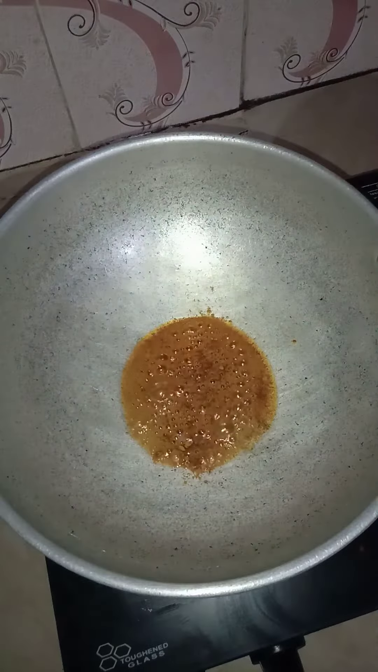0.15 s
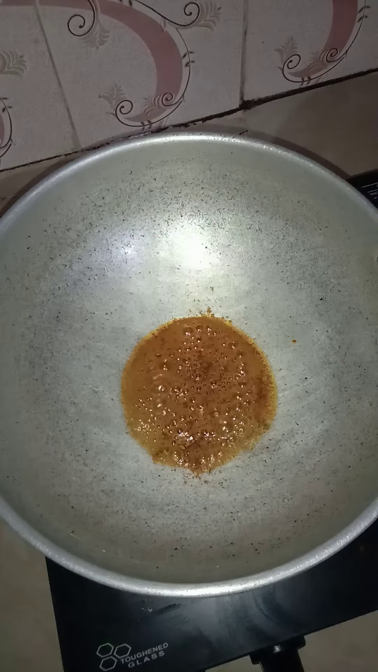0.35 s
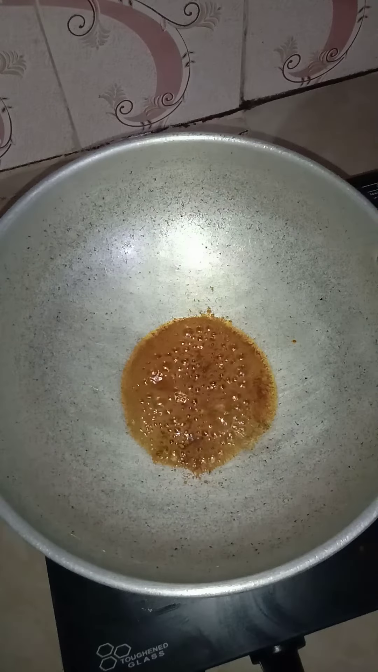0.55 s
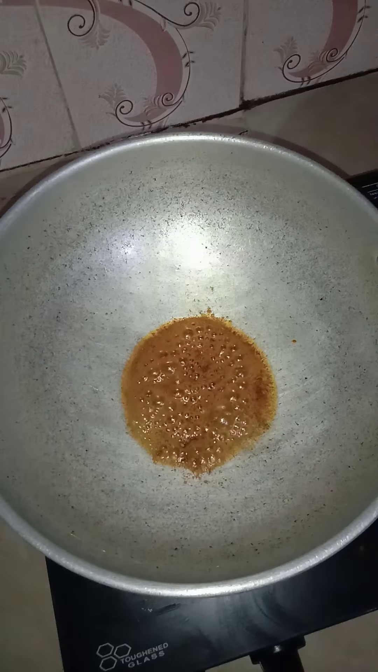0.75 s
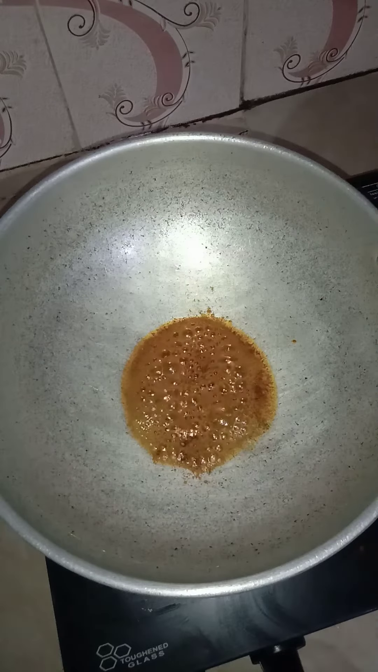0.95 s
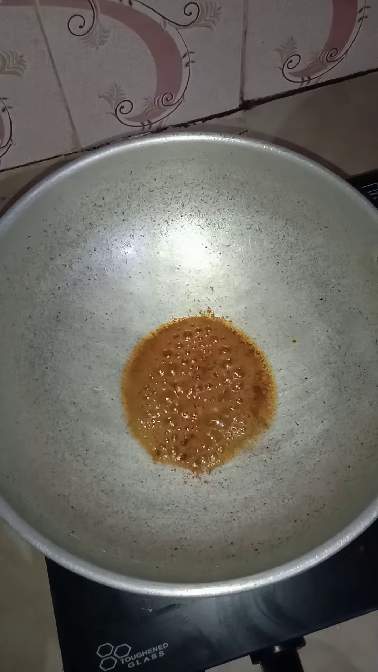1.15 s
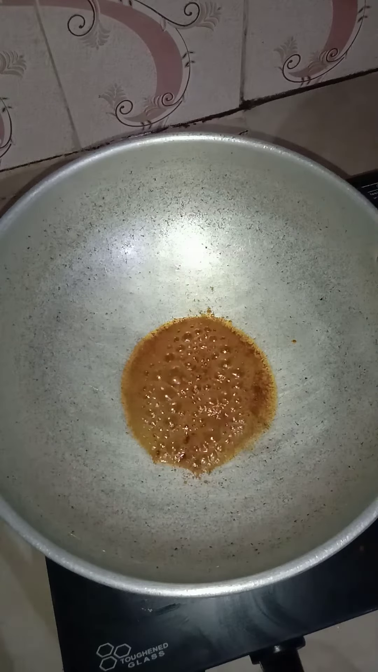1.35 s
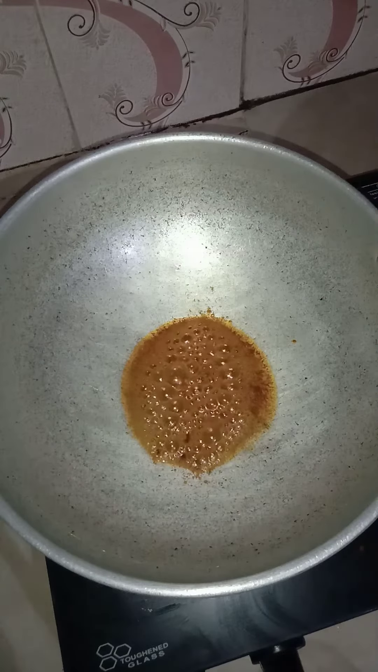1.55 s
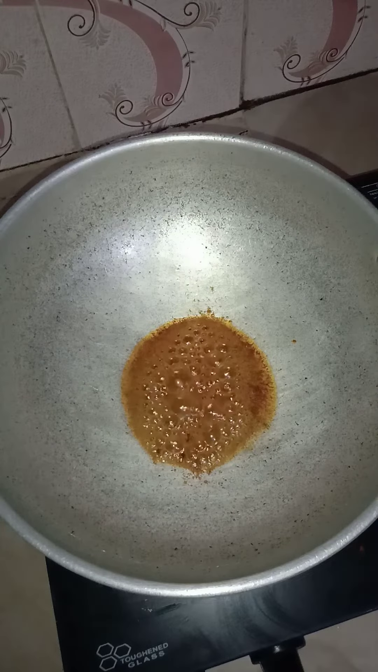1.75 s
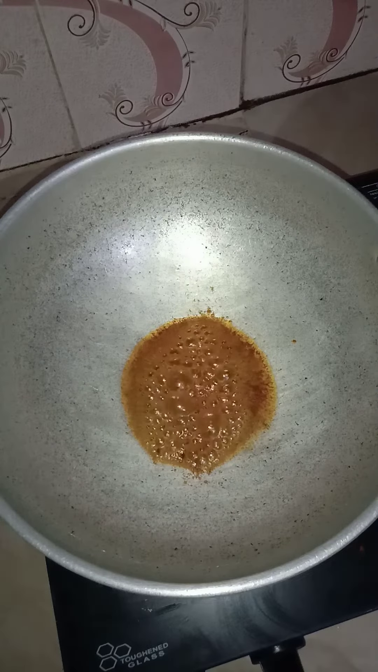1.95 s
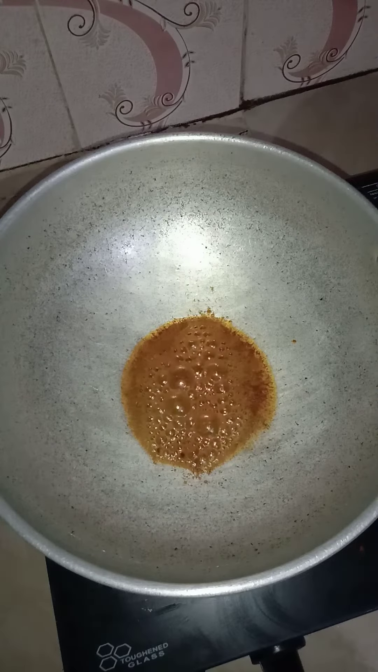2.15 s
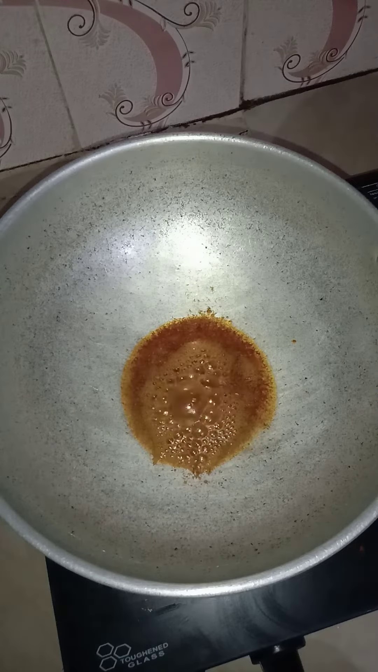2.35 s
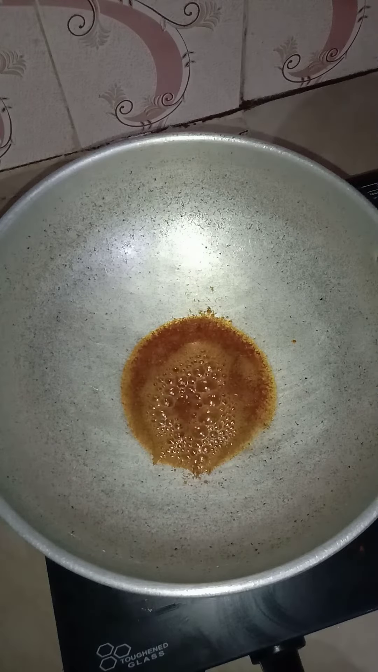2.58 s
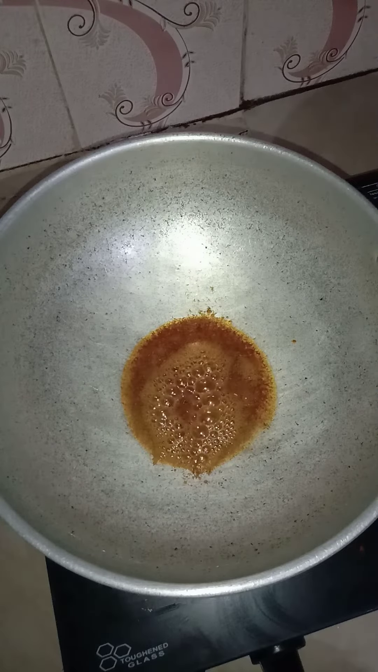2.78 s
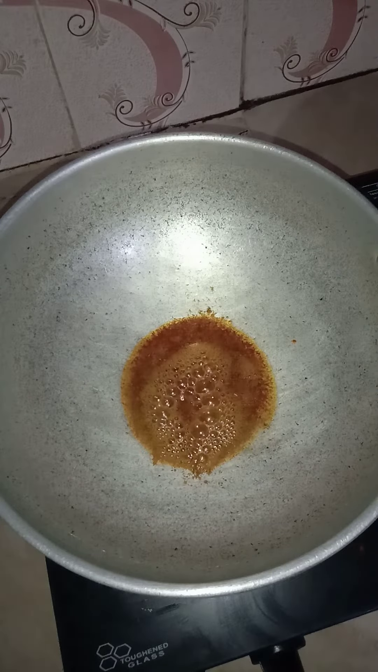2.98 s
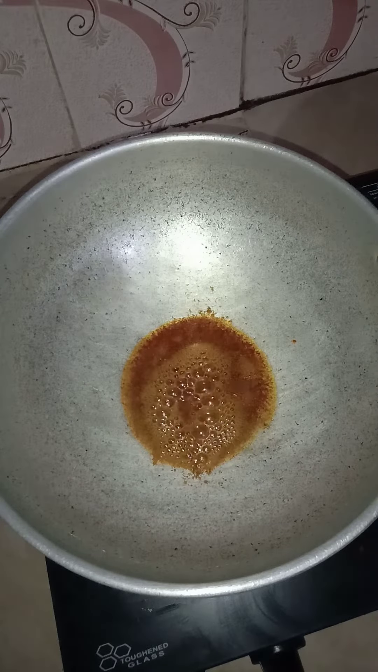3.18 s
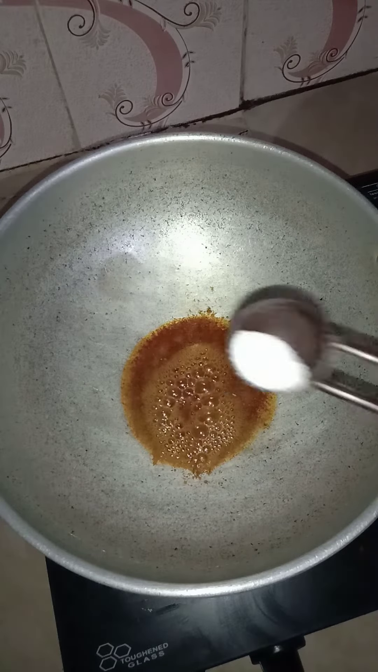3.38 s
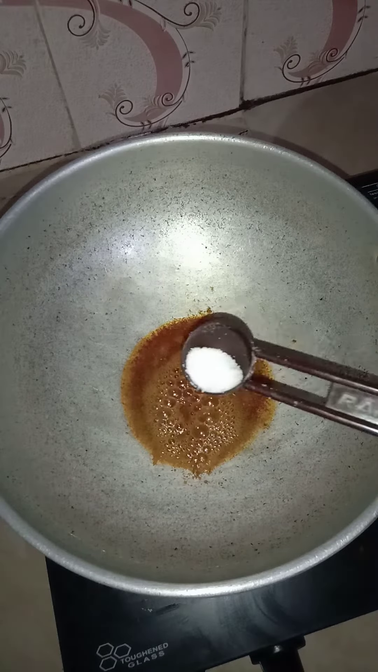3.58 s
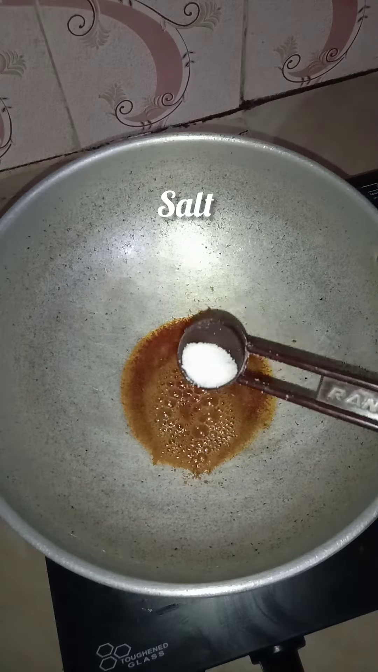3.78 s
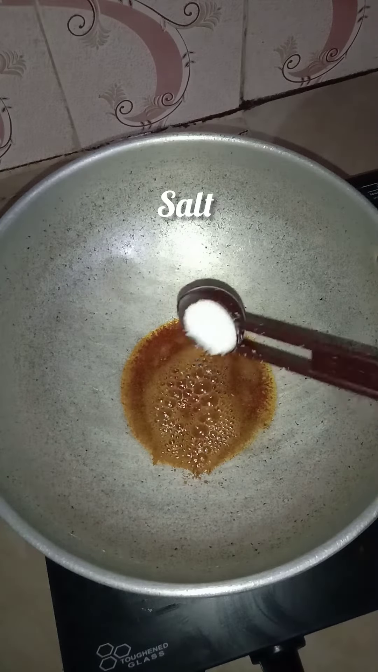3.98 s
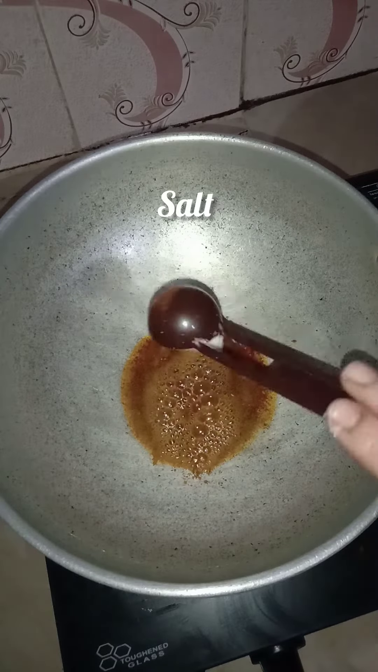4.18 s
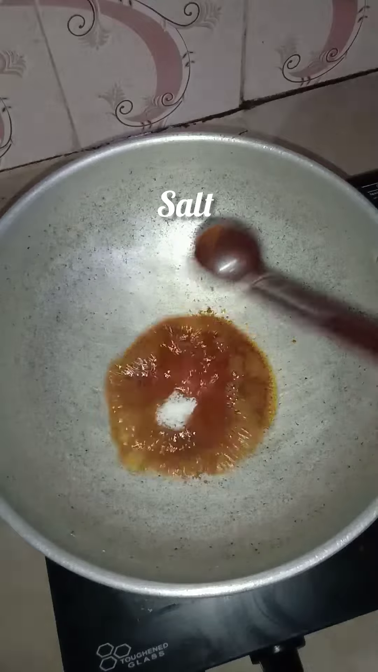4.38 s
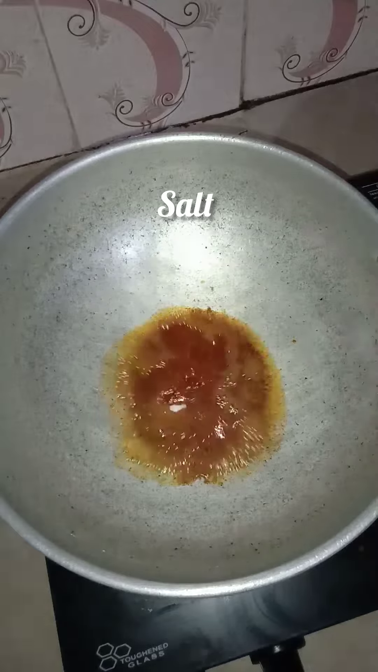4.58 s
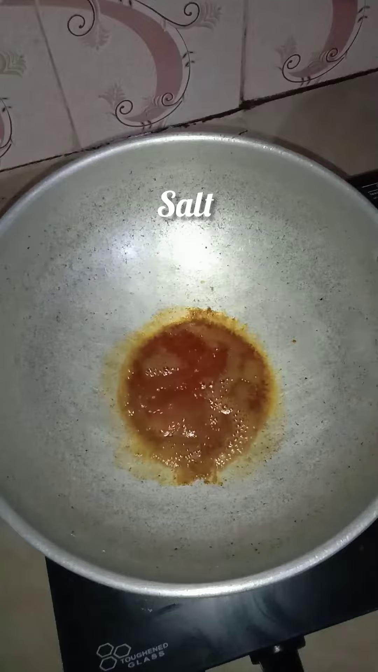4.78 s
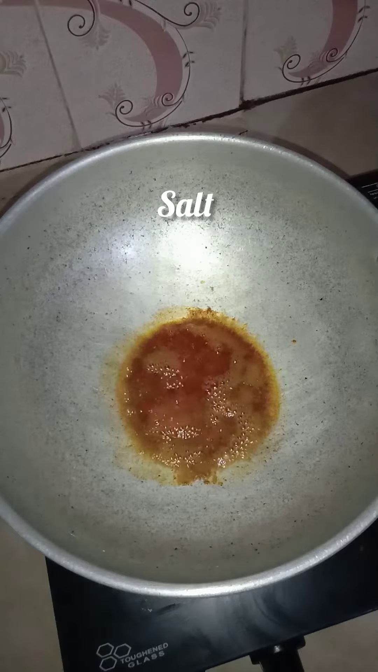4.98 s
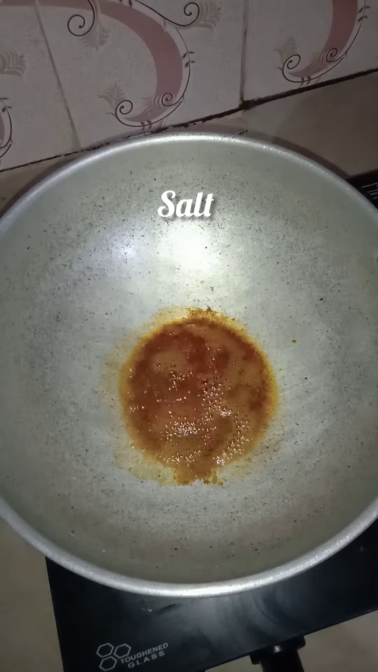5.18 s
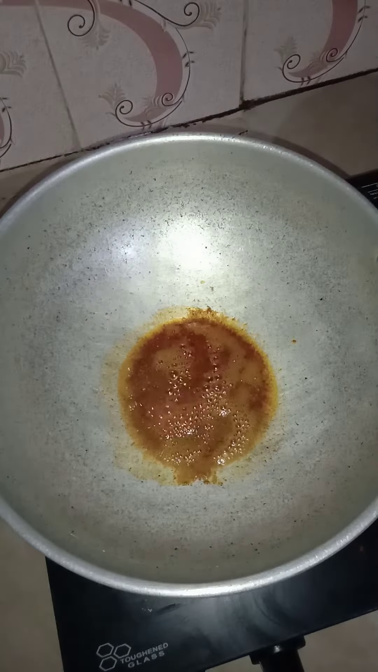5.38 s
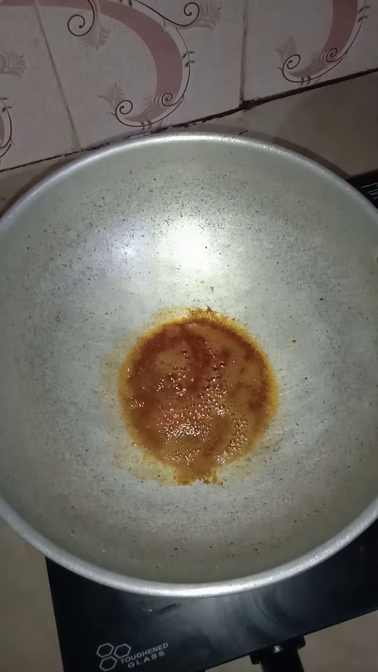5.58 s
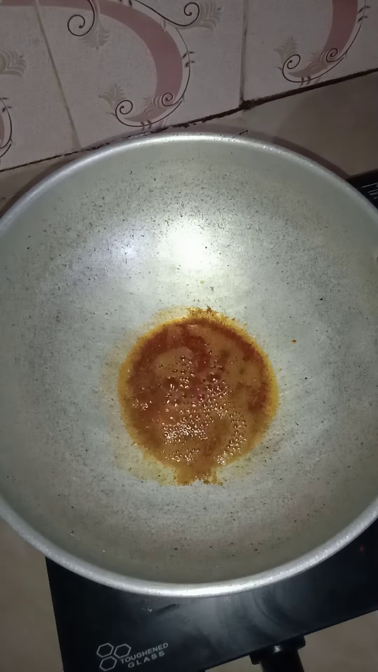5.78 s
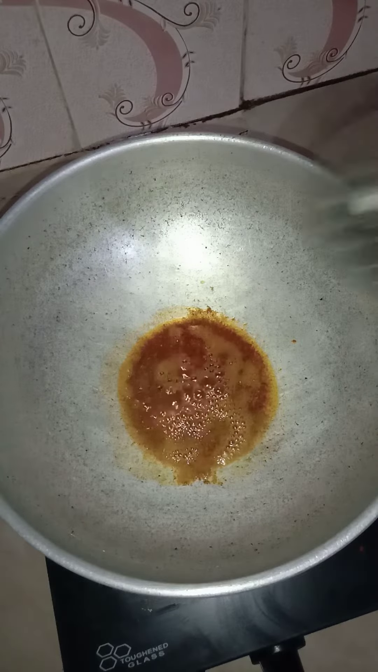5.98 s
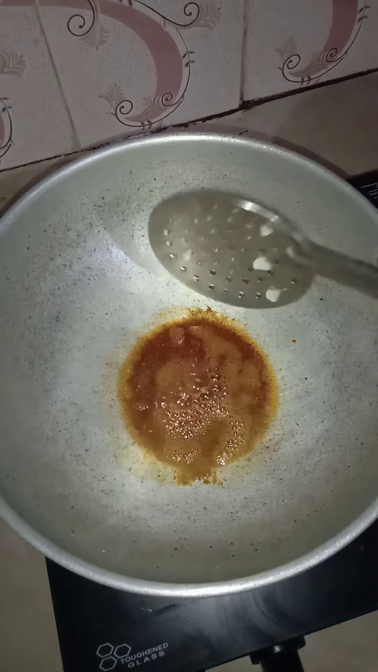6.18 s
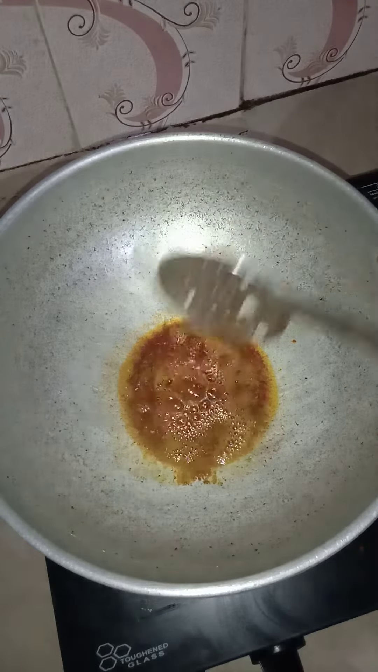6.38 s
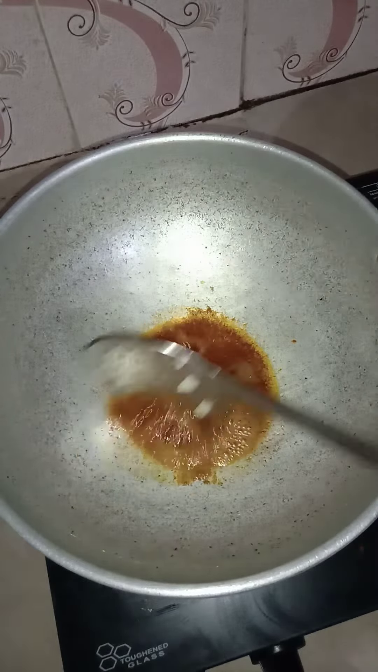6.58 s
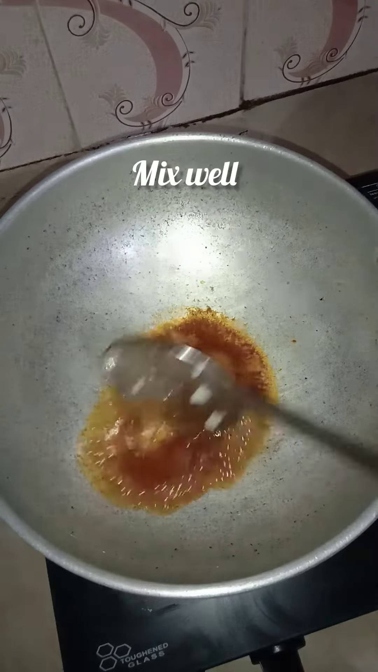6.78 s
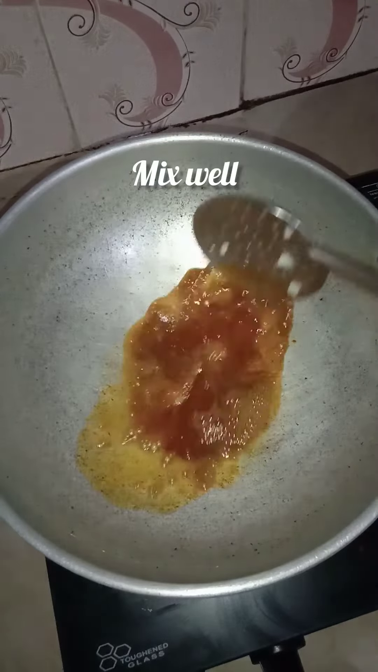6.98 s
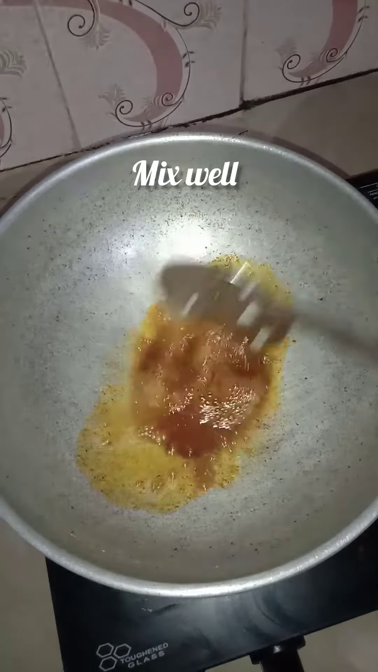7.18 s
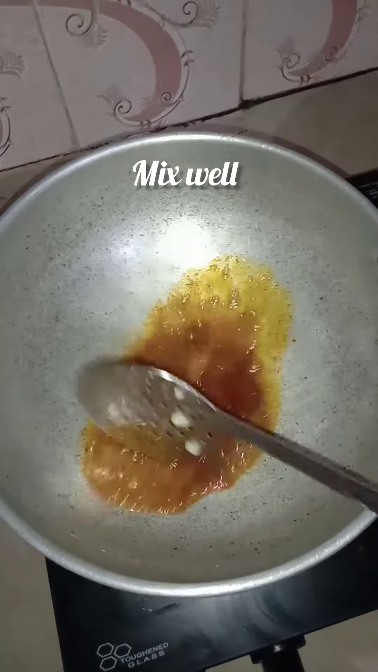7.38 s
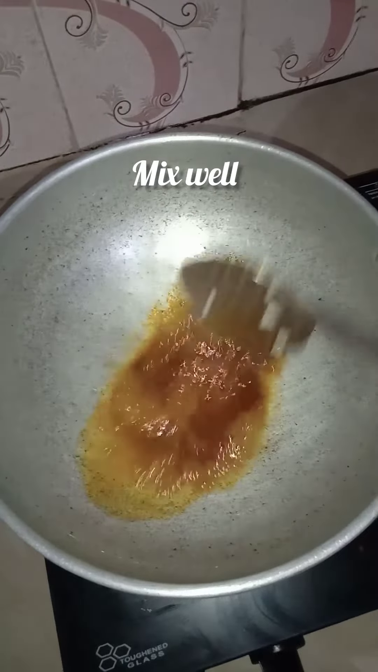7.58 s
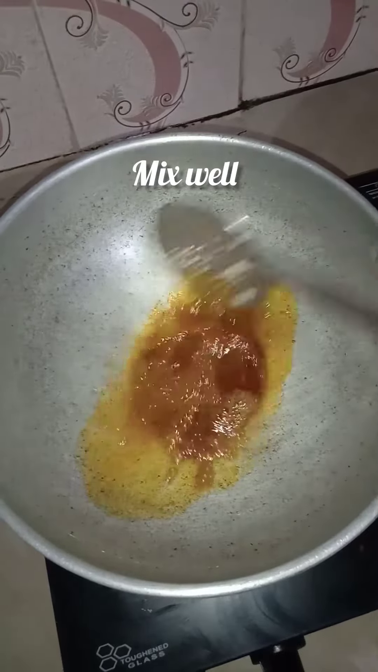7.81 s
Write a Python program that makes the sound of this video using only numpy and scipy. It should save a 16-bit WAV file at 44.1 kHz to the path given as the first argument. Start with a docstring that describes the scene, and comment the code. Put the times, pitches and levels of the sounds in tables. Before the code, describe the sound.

Quiet bubbling and spitting oil, a brief salt fizz, heavy counter knocks, then ladle bangs on a thin pan amid sharp frying.

```python
"""Spice paste simmers in oil in a thin metal pan: filtered random clicks and noise stand for bursting bubbles.
Drops of water spit, and salt makes the oil flare up. Jars are handled (gritty noise) and things are put down on
the counter (damped modes and noise bursts); a spoon clinks on a jar. Then a ladle knocks and scrapes round the
pan (driven resonators) while the paste fries loudly. The burner and the street rumble below as low noise;
horns sound far away as wavering partials, and a dull clatter comes from another room."""
import sys
import numpy as np
from scipy import signal
from scipy.fft import rfft, irfft
from scipy.io import wavfile

SR = 44100
rng = np.random.default_rng(int(sys.argv[2]) if len(sys.argv) > 2 else 0)


def to_wav(sig):
    """Store sig (one row per channel, or 1-D mono) as 16-bit WAV at the path in sys.argv[1].

    Samples outside -1..1 are clipped; the rate is SR.
    """
    pcm = np.clip(np.atleast_2d(sig), -1, 1) * 32767
    pcm = np.round(pcm).astype(np.int16)
    wavfile.write(sys.argv[1], SR, pcm.T)  # frames by channels


N = 346173

# spectrum shared by frying, rubs, crisp contacts and hiss: (frequency [Hz], density [dB per Hz])
FIZZ_SPECTRUM = [(710, -56.5), (1200, -6), (1590, -17.5), (2720, -10), (4320, -10), (5470, -9.5),
                 (6090, -2.5), (6640, -7), (7240, 2), (11500, -38), (13500, -41), (14900, -24),
                 (15700, -24)]
# course of the quiet simmer: (time [s], fizz level [dB])
SIMMER_LEVEL = [(0.0, -66.5), (2.33, -70), (2.78, -76), (4.2, -77), (4.9, -69), (5.6, -65), (6.2, -71)]
# ladle on the pan: (time [s], blow level [dB], splash [dB re blow], centre [Hz], drag [dB re blow])
LADLE_BLOWS = [(6.225, -63, 14, 1210, -15.5), (6.398, -27.5, 1, 555, -20.5), (6.711, -32, 0, 362, -17),
               (6.822, -46.5, -9, 1260, -15), (7.047, -40, -7, 684, -8), (7.156, -37.5, 9, 870, -49),
               (7.379, -30, -25, 514, -21), (7.504, -43, 15, 654, -12.5), (7.687, -43, 2, 734, -5)]


def from_db(db):
    """Level law: 20 dB is a tenfold amplitude."""
    return 10 ** (np.asarray(db) / 20)


def rms_one(x):
    """Normalisation to unit root-mean-square."""
    return x / np.sqrt(np.mean(x ** 2) + 1e-20)


def in_time(rows):
    """Linear interpolation of a (time, values...) table at each sample."""
    s, *columns = np.transpose(rows)
    return [np.interp(np.arange(N) / SR, s, column) for column in columns]


def between(t0, t1, edge):
    """Gating: gain one from t0 to t1, with linear ramps of edge seconds inside."""
    t = np.arange(N) / SR
    return np.clip(np.minimum(t - t0, t1 - t) / edge, 0, 1)


def swell(start, rise, peak_db, fade_db):
    """Exponential decay: gain rises to a peak, then falls by fade_db each second."""
    since = np.arange(N) / SR - start
    return np.clip(since / rise, 0, 1) ** 2 * from_db(peak_db - fade_db * np.maximum(since - rise, 0))


def band(x, low_hz, high_hz):
    """Band-pass filtering, third-order Butterworth."""
    edges_hz = [low_hz, min(high_hz, .45 * SR)]
    return signal.sosfilt(signal.butter(3, edges_hz, "band", fs=SR, output="sos"), x + 1e-18)


def coloured(x, spectrum):
    """Minimum-phase filtering: a folded cepstrum gives a causal response with this spectrum; rms 1."""
    hz, level_db = np.transpose(spectrum)
    grid = np.maximum(np.arange(4097) * SR / 8192, 1)
    magnitude = from_db(np.interp(np.log(grid), np.log(hz), level_db))
    cepstrum = irfft(np.log(magnitude))
    cepstrum[1:4096] *= 2
    cepstrum[4097:] = 0
    response = irfft(np.exp(rfft(cepstrum)))
    return rms_one(signal.fftconvolve(x, response)[:N])


def drift(rate):
    """Low-pass random modulation of unit rms; rate in Hz."""
    r = np.exp(-2 * np.pi * rate / SR)
    noise = rng.standard_normal(N + SR)
    return rms_one(signal.lfilter([1], [1, -2 * r, r * r], noise)[SR:])   # the first second settles


def grains(per_s, spread_db):
    """Random impulse process: clicks of either sign, most small and a few large; rms 1."""
    sizes = from_db(spread_db * np.minimum(rng.exponential(1, N), 5))
    signs = rng.choice([-1, 1], N)
    return rms_one(sizes * signs * (rng.random(N) < per_s / SR))


def clicks(times, level_db):
    """Impulsive excitation: one click at each time."""
    out = np.zeros(N)
    out[np.round(np.asarray(times) * SR).astype(int)] = from_db(level_db)
    return out


def ring(x, modes):
    """Modal superposition: one push drives all damped resonators, signs alternating."""
    out = np.zeros(N)
    for k, (hz, level_db, t60) in enumerate(modes):
        r, w = from_db(-60 / (t60 * SR)), 2 * np.pi * hz / SR
        mode = signal.lfilter([0, np.sin(w)], [1, -2 * r * np.cos(w), r * r], x + 1e-18)
        out += (-1) ** k * from_db(level_db) * mode
    return out


def dying(x, t60):
    """Exponential decay: each click starts a puff of noise that falls 60 dB in t60 seconds."""
    return signal.lfilter([1], [1, -from_db(-60 / (t60 * SR))], x + 1e-18) * rng.standard_normal(N)


def three_bands(source, main_db, low_db, high_db, edges_hz, patchy_db):
    """Band-wise modulation: low and high parts swell against the middle, each band flickering alone."""
    parts = []
    for low_hz, high_hz in zip(edges_hz, edges_hz[1:]):
        part = rms_one(band(source, low_hz, high_hz))
        parts.append(part * from_db(patchy_db * drift(22.4)))
    low, mid, high = parts
    return from_db(main_db) * (mid + from_db(low_db) * low + from_db(high_db) * high)


def frying():
    """Bubble noise: steam bubbles burst by the thousand, in clumps, over a smooth hiss; some pop harder."""
    # stirring spreads the paste over hot metal: (time [s], fizz level [dB])
    stir_level = [(6.215, -39), (6.23, -53), (6.39, -48.5), (6.41, -39), (6.59, -42), (6.65, -33),
                  (6.78, -29), (6.96, -29), (7.04, -32.5), (7.12, -30), (7.58, -28.5), (7.61, -33),
                  (7.85, -32)]
    # balance of the bands against the fizz: (fizz level [dB], crackle [dB re fizz], spray [dB re fizz])
    liveliness = [(-85, -17, -4), (-72, -14, -18), (-53.5, -16.5, -5.5), (-25, -18.5, -10)]
    salt = swell(4.215, rise=0.024, peak_db=-49.5, fade_db=28.5)   # salt makes the oil flare up
    stir = between(stir_level[0][0], 9, edge=0.01) * from_db(in_time(stir_level)[0])
    simmer = from_db(in_time(SIMMER_LEVEL)[0])
    fizz_db = 10 * np.log10(simmer ** 2 + salt ** 2 + stir ** 2)   # powers add
    bursts = grains(5000 * from_db(3.0 * drift(40)), spread_db=2.5) + 0.94 * rng.standard_normal(N)
    bursts = bursts + 0.4 * grains(250, spread_db=3.0)   # the harder pops
    for hz in np.geomspace(2400, 8500, 9):   # patches of bubbles of one size swell and ring
        bursts = bursts + (from_db(2.2 * drift(10)) - 1) * band(bursts, hz / 1.07, hz * 1.07)
    steps, crackle, spray = np.transpose(liveliness)
    crackle_db = np.interp(fizz_db, steps, crackle)
    spray_db = np.interp(fizz_db, steps, spray)
    return three_bands(coloured(bursts, FIZZ_SPECTRUM), fizz_db, crackle_db, spray_db,
                       edges_hz=(1500, 4200, 10300, 18000), patchy_db=0.74)


def background():
    """Slowly varying filtered noise: lumpy rumble, room hum, the pan's thin whistles; microphone hiss."""
    # course of the low rumble: (time [s], level [dB])
    rumble_level = [(0.0, -75.5), (1.4, -75.5), (2.4, -64), (2.8, -73), (4.2, -71.5), (5.1, -70.5),
                    (5.9, -64.5), (6.1, -65), (7.85, -59)]
    # rumble spectrum: (frequency [Hz], density [dB per Hz])
    low_end = [(25, -45), (102, 2.5), (129, -0.5), (146, -32), (200, -20), (260, -56.5)]
    # room hum spectrum: (frequency [Hz], density [dB per Hz])
    room_tone = [(100, -29.5), (170, 3.5), (221, -5.5), (414, -5), (624, -10), (942, -14.5), (2600, -21.5),
                 (3600, -52)]
    # the simmering pan sings faintly: (frequency [Hz], width [Hz], level [dB re simmer])
    whistles = [(1230, 187, -22.5), (2123, 89, -21.5)]
    (level_db,) = in_time(rumble_level)
    shake = sum(swell(s, rise=0.021, peak_db=blow_db - 27, fade_db=138)   # each blow shakes the stove
                for s, blow_db, *_ in LADLE_BLOWS)
    rumble_gain = from_db(level_db + 5.0 * drift(3.0)) + shake
    out = rumble_gain * coloured(rng.standard_normal(N), low_end)
    out += from_db(-80 + 2.0 * drift(4.1)) * coloured(rng.standard_normal(N), room_tone)
    for hz, width_hz, whistle_db in whistles:
        whistle = rms_one(band(rng.standard_normal(N), hz - width_hz / 2, hz + width_hz / 2))
        out += from_db(in_time(SIMMER_LEVEL)[0] + whistle_db + 3.5 * drift(6)) * whistle
    hiss = rms_one(band(coloured(rng.standard_normal(N), FIZZ_SPECTRUM), 10000, 15000))
    return out + from_db(-88.5) * hiss


def spits():
    """Impulsive boiling: drops of water pop or sputter up in the oil, then a ragged spray thins out."""
    # drops: (time [s], rise [s], level [dB], coarse part [dB re fine part], coarse centre [Hz], length [s])
    drops = [(0.231, 0.0025, -53.5, 3.5, 1830, 0.18), (0.323, 0.0025, -44, -33, 3400, 0.063),
             (0.374, 0.044, -56.5, 8.5, 2640, 0.046), (0.634, 0.0036, -44.5, 1, 3120, 0.015),
             (0.646, 0.0034, -50.5, 3, 4000, 0.031), (1.427, 0.034, -62, 8.5, 3640, 0.057),
             (1.465, 0.0037, -60, 16, 2670, 0.06), (1.491, 0.003, -49.5, -4, 1360, 0.12),
             (1.695, 0.017, -65, 4.5, 3250, 0.088), (3.013, 0.0017, -62, -18, 2940, 0.12),
             (4.53, 0.004, -72.5, 16.5, 1500, 0.052), (7.372, 0.003, -35, -22, 3770, 0.014)]
    sudden_s = 0.01   # drops that rise faster start with a pop
    ragged = grains(900, spread_db=3.5) + 0.25 * rng.standard_normal(N)
    fine = rms_one(band(coloured(ragged, FIZZ_SPECTRUM), 3540, 8360))
    out = np.zeros(N)
    for s, rise, level_db, coarse_db, centre_hz, length in drops:
        now = slice(round(s * SR), round((s + .3) * SR))
        t = np.arange(len(out[now])) / SR
        coarse = rms_one(band(ragged[now], centre_hz / 1.97, centre_hz * 1.95))
        burst = (rise < sudden_s) * from_db(-60 * t / 0.012)
        spray = np.minimum(t / rise, 1) * from_db(-25 * np.maximum(t - rise, 0) / length)
        out[now] += from_db(level_db - 2.5) * (burst + 0.5 * spray) * (fine[now] + from_db(coarse_db) * coarse)
    s, rise, level_db, *_ = np.transpose(drops)
    sudden = rise < sudden_s
    pop_mode = [(6700, -1.2, 0.0011)]   # (frequency [Hz], level [dB], t60 [s])
    return out + ring(clicks(s[sudden], level_db[sudden]), pop_mode)


def street():
    """Random phase and amplitude modulation: horn partials waver with the air; a clatter in another room."""
    # faint far tones, mostly horns, a row a partial: (start [s], end [s], frequency [Hz], level [dB])
    partials = [(2.06, 2.14, 2780, -81), (2.78, 3.53, 412, -73), (2.75, 3.55, 2930, -78),
                (2.68, 2.85, 2120, -77), (2.82, 2.93, 1965, -78), (5.63, 6.08, 2043, -77),
                (5.65, 6.08, 3293, -71), (4.63, 4.82, 2390, -76), (5.778, 6.153, 407, -80),
                (6.137, 6.38, 3650, -63)]
    blur_share = .02   # echoes smear each partial by this share of its pitch, up and down
    tone_share = .62   # amplitude share that stays a clear tone
    t = np.arange(N) / SR
    out = np.zeros(N)
    for start, end, hz, level_db in partials:
        blur = rms_one(band(rng.standard_normal(N), hz * (1 - blur_share), hz * (1 + blur_share)))
        gain = from_db(level_db + 3.0 * drift(14))
        tone = np.sin(2 * np.pi * hz * t + .9 * drift(12))
        waver = gain * (tone_share * tone + (1 - tone_share) * blur)
        trail = from_db(-200 * np.clip(t - end, 0, 1))   # echoes trail off
        out += between(start, end + 0.15, edge=0.05) * trail * waver
    since = np.maximum(t - 3.62, 0)   # one dull clatter in another room
    puff = np.minimum(since / .035, 1) ** 2 * from_db(-58 - 60 * since / 0.4)
    white = rng.standard_normal(N)
    return out + puff * rms_one(band(white, 1140, 2330) + 1.7 * band(white, 1560, 2000))


def handling():
    """Friction noise: fingers and lids rub on jars, fine grit and stray ticks over a dull body."""
    # rubs: (start [s], rise [s], level [dB], fade [dB per s], dry edge [dB re rub])
    rubs = [(2.345, 0.063, -48.5, 214, -2.5), (2.602, 0.019, -50.5, 160, -3.5),
            (5.03, 0.011, -53.5, 126, -11), (5.188, 0.0035, -62, 112, -16), (5.344, 0.013, -53, 91, -13)]
    grit = grains(3000, spread_db=2.5) + 0.7 * grains(120, spread_db=2.0) + rng.standard_normal(N)
    body = sum(swell(s, rise, level_db, fade_db) for s, rise, level_db, fade_db, _ in rubs) + 1e-9
    edge = sum(swell(s, rise, level_db + edge_db, fade_db)
               for s, rise, level_db, fade_db, edge_db in rubs) + 1e-9
    return three_bands(coloured(grit, FIZZ_SPECTRUM), 20 * np.log10(body), -9.0, 20 * np.log10(edge / body),
                       edges_hz=(900, 4400, 10300, 18000), patchy_db=-3.5)


def knocks():
    """Modal impact: counter modes near the struck spot's centre thud loudest; jar clacks, contact ticks."""
    # things tapped or put down: (time [s], thud level [dB], thud centre [Hz], clack [dB re thud],
    # tick [dB re thud], tick centre [Hz], edge [dB re thud], length factor [1])
    contacts = [(2.350, -45.5, 315, -9, -22, 6050, -26, 1.95), (2.476, -29, 595, 4, -0.5, 6200, -30, 0.76),
                (2.527, -44, 170, -25, -16, 7000, -3, 0.38), (2.619, -60, 490, -7, 4, 5970, 15, 3.6),
                (4.216, -47.5, 780, -21, -15, 4200, -31, 2.9),
                (4.241, -47.5, 760, -10, -16, 4000, -13, 0.49), (4.919, -38, 345, 6, 0.5, 5650, -29, 0.9),
                (4.967, -15.5, 454, -7.5, -21.5, 5950, -26, 1.48),
                (5.027, -27.5, 507, 5, -3, 4750, -11.5, 0.7), (5.075, -30, 394, -4.5, -35, 5000, -31, 1),
                (5.185, -21, 504, -5, -16.5, 3900, -21, 0.86),
                (5.237, -34, 568, -5.5, -16, 3200, -21, 0.79), (5.277, -56, 543, 9, 2, 2900, -35, 1.6),
                (5.331, -33.5, 560, 3.5, -6, 3900, -15, 0.6), (5.360, -43.5, 424, 1, -2.5, 3200, -11, 2.3),
                (5.375, -38, 580, -1, -7.5, 3630, -12, 1.15)]
    # counter modes: (mean frequency [Hz], level [dB], t60 at length factor 1 [s])
    counter_modes = [(171, 4, 0.2), (267, 0, 0.07), (325, -1, 0.13), (480, -2, 0.07), (575, -2, 0.09),
                     (790, -3, 0.04)]
    # jar modes: (mean frequency [Hz], level [dB], t60 at length factor 1 [s])
    jar_modes = [(1270, 0, 0.03), (1480, 2, 0.03)]
    hiss, white = coloured(rng.standard_normal(N), FIZZ_SPECTRUM), rng.standard_normal(N)
    crisp = rms_one(band(hiss, 5100, 13000))
    edge = rms_one(band(hiss, 13000, .45 * SR))
    out, t = np.zeros(N), np.arange(round(.3 * SR)) / SR
    for s, thud_db, centre_hz, clack_db, tick_db, tick_hz, edge_db, length in contacts:
        now = slice(round(s * SR), round(s * SR) + len(t))
        modes = [(hz, thud_db - 3.0 + mode_db - 5.2 * length * abs(np.log2(hz / centre_hz)), t60)
                 for hz, mode_db, t60 in counter_modes]
        modes += [(hz, thud_db + clack_db - 2.5 + mode_db, t60) for hz, mode_db, t60 in jar_modes]
        for hz, level_db, t60 in modes:
            decay = from_db(level_db + rng.normal(0, 2.8) - 60 * t / (length * t60))
            onset = np.minimum(t * hz / 2.57, 1)
            out[now] += decay * onset * np.sin(2 * np.pi * (hz * rng.normal(1, 0.02) * t + rng.random()))
        # many close modes blur into noise
        thump = rms_one(band(white[now], centre_hz / 2.86, centre_hz * 1.43))
        thump_fade = from_db(thud_db - 7.0 - 3.24 * length - 60 * t / (0.14 * length))
        out[now] += thump_fade * np.minimum(t / 0.012, 1) * thump
        clack = rms_one(band(white[now], 1200, 2900))
        out[now] += from_db(thud_db + clack_db / 2 - 15.0 - 60 * t / (0.078 * length)) * clack
        tick = rms_one(band(white[now], tick_hz / 1.3, tick_hz * 1.11)) + 0.73 * crisp[now]
        tick_fade = from_db(-60 * t / (0.028 * length)) + 0.17 * from_db(-60 * t / (0.04 * length))
        out[now] += from_db(thud_db + tick_db) * tick_fade * tick
        out[now] += from_db(thud_db + edge_db + 3.0 - 60 * t / 0.044) * edge[now]
    return out


def spoon():
    """Resonance of thin steel under a noisy push: a soft, blurred clink on a jar."""
    # contacts: (time [s], push level [dB])
    clinks = [(5.504, -43.5)]
    # spoon modes: (frequency [Hz], level [dB], t60 [s])
    spoon_modes = [(3980, 0, 0.03), (4500, -8, 0.05), (5600, -3, 0.06), (6330, -6, 0.09)]
    s, level_db = np.transpose(clinks)
    envelope = sum(swell(at, rise=0.0088, peak_db=db, fade_db=520) for at, db in zip(s, level_db))
    push = envelope * rng.standard_normal(N)
    return from_db(-23.5) * ring(push, spoon_modes) + from_db(-5.5) * band(push, 3460, 8500)


def ladle():
    """Forced vibration: blows and a gritty drag drive the same damped pan; blows crack and splash oil."""
    # pan modes: (mean frequency [Hz], level [dB], t60 [s])
    pan_modes = [(142.3, 2, 0.55), (221.2, -0.5, 0.24), (315, 3.5, 0.11), (530, -1.5, 0.29),
                 (757, 5.5, 0.082), (1295, 3, 0.11)]
    # rim mode: (frequency [Hz], level [dB], t60 [s])
    rim_modes = [(1249, 0, 0.06), ]
    # the rim sings most in mid stir: (time [s], level [dB])
    rim_level = [(6.2, -66), (6.7, -67), (6.83, -56), (7.3, -57), (7.4, -63)]
    s, level_db, splash_db, centres_hz, drag_db = np.transpose(LADLE_BLOWS)
    grit = grains(500 * from_db(6.0 * drift(20)), spread_db=3.0)
    rasp, blows = rms_one(band(grit, 223, 1320)), np.zeros(N)
    for at, db, centre_hz, rub_db in zip(s, level_db, centres_hz, drag_db):
        # modes near the struck spot's centre ring loudest; the paste detunes them
        near = [(hz * rng.normal(1, 0.052), mode_db - 3.8 * abs(np.log2(hz / centre_hz)), t60)
                for hz, mode_db, t60 in pan_modes]
        blows += ring(clicks([at], db - 14.5), near)
        crack = dying(clicks([at], db + 1.0), 0.28)
        blows += band(crack, centre_hz / 2.33, centre_hz * 1.76)
        drag = rms_one(rms_one(ring(grit, near)) + 0.77 * rasp)
        blows += swell(at, rise=0.0095, peak_db=db + rub_db, fade_db=79) * drag
    wet = clicks(s, level_db + splash_db)
    splash = band(from_db(-0.5) * dying(wet, 0.21) + from_db(2.0) * dying(wet, 0.04), 3540, 7440)
    rim = from_db(in_time(rim_level)[0] + 1.9 * drift(2.7)) * rms_one(ring(grit, rim_modes))
    return blows + splash + between(s[0], 9, edge=0.12) * rim


def kitchen(x):
    """Diffuse reverberation: dense reflections off tiles, fading and a little dull."""
    t60_s = 0.33
    t = np.arange(round(.5 * SR)) / SR
    tail = rng.standard_normal(len(t)) * from_db(-60 * t / t60_s) * np.clip(t / 0.015, 0, 1)
    tail = signal.lfilter([1], [1, -.4], tail)
    return signal.fftconvolve(x, tail / np.linalg.norm(tail))[:N]


def scene():
    """Superposition: hits get the room's reverberation; frying, rubs, far tones and rumble are added dry."""
    hits = knocks() + ladle() + spoon() + spits()
    # the hits carry no deep bass
    hits = signal.sosfilt(signal.butter(4, 125, "high", fs=SR, output="sos"), hits)
    room = from_db(-11.5) * kitchen(hits)
    return (hits + room + frying() + handling() + street() + background())[None]


def record(dry):
    """Saturation and band limiting: the loudest peaks are rounded and the top is cut steeply."""
    cutoff_hz = 15650
    rounded = .25 * np.tanh(dry / .25)
    return signal.sosfilt(signal.ellip(12, .5, 50, cutoff_hz, fs=SR, output="sos"), rounded)


dry = scene()
out = record(dry)
to_wav(out)
```